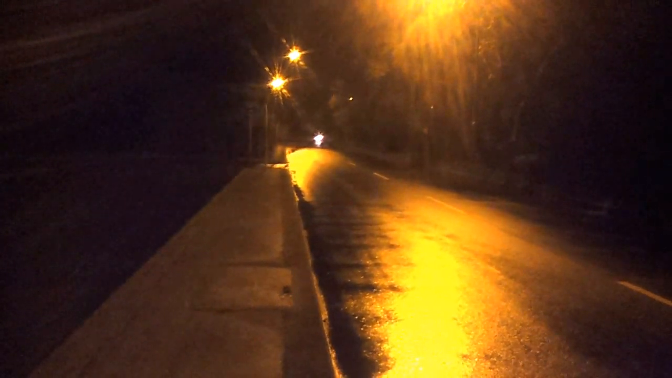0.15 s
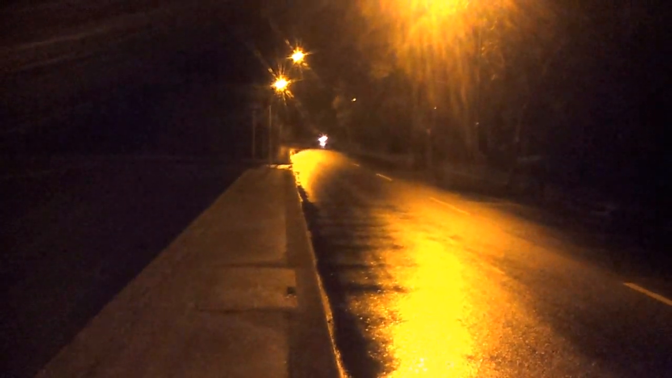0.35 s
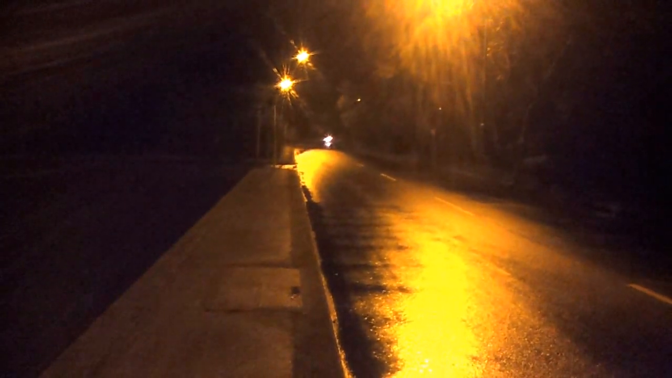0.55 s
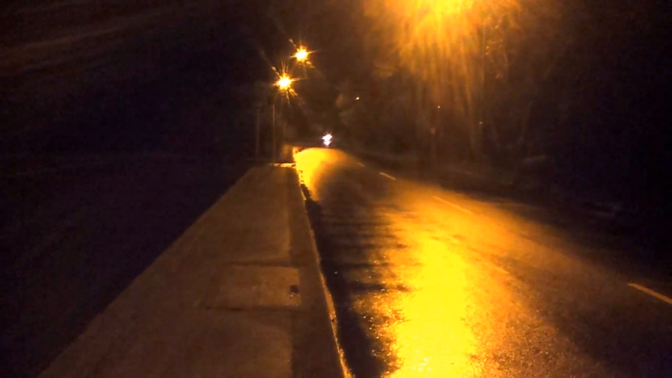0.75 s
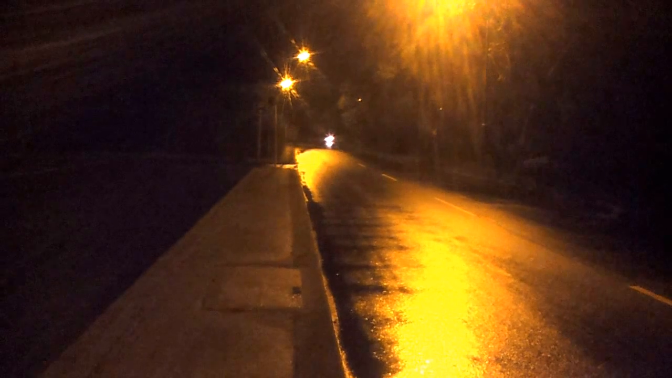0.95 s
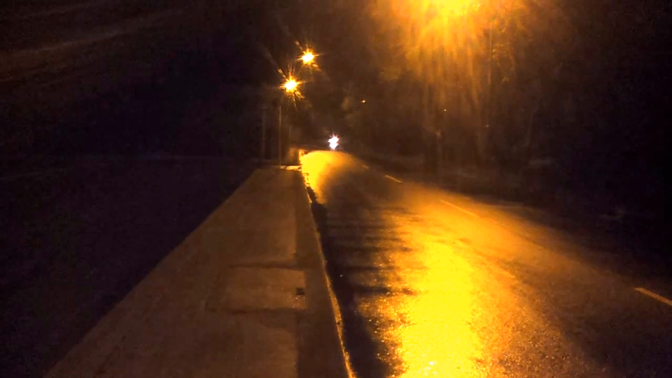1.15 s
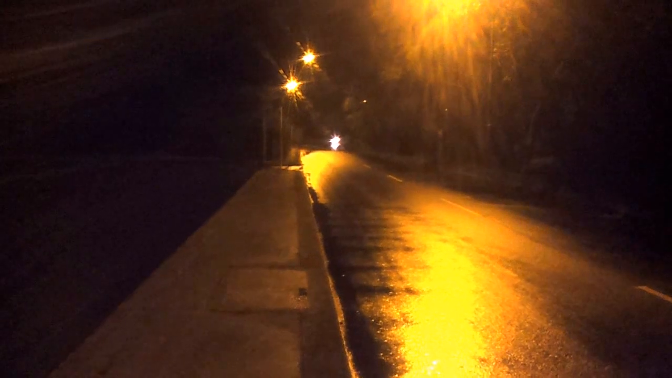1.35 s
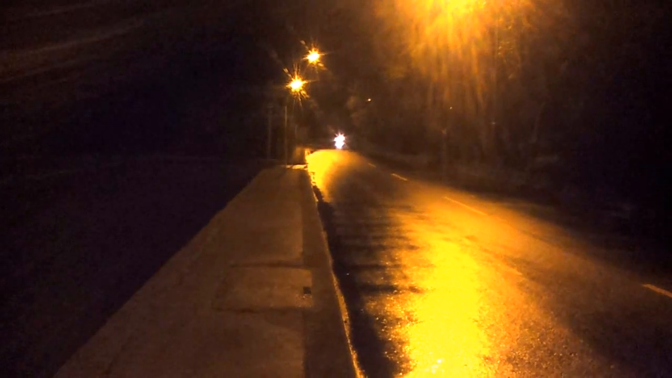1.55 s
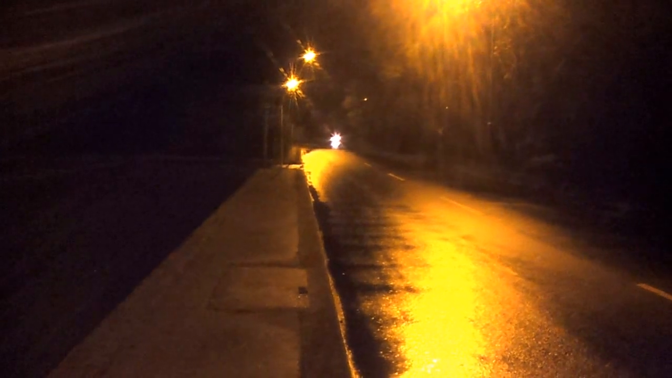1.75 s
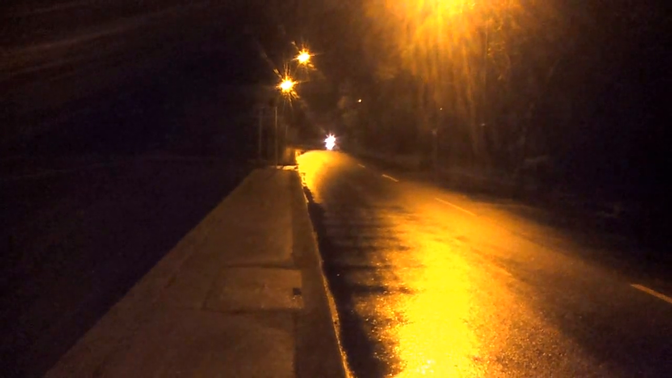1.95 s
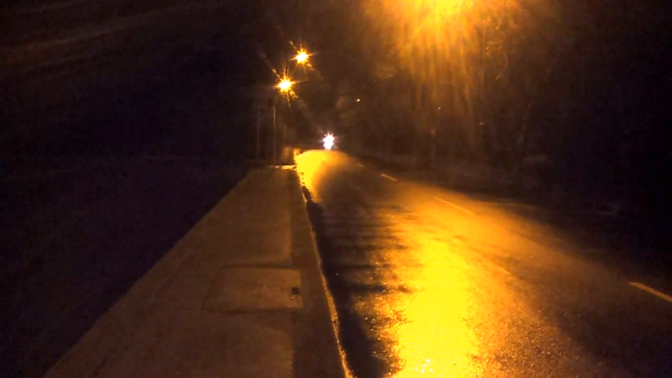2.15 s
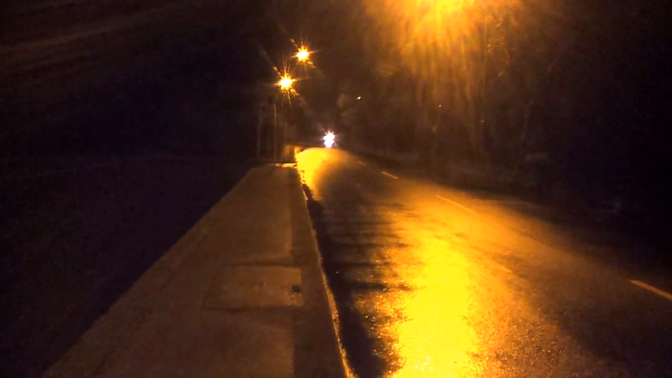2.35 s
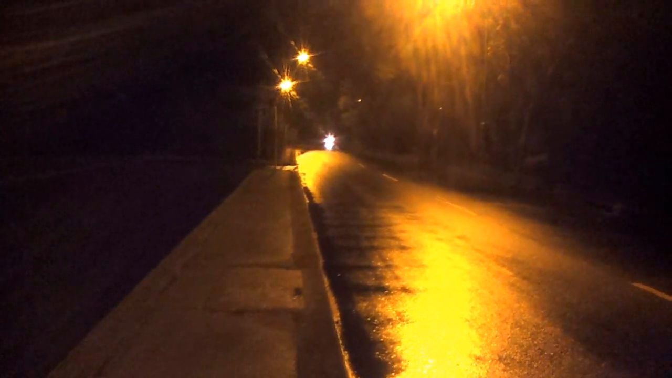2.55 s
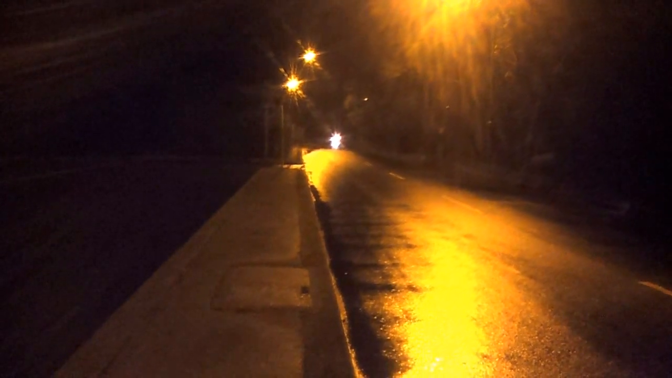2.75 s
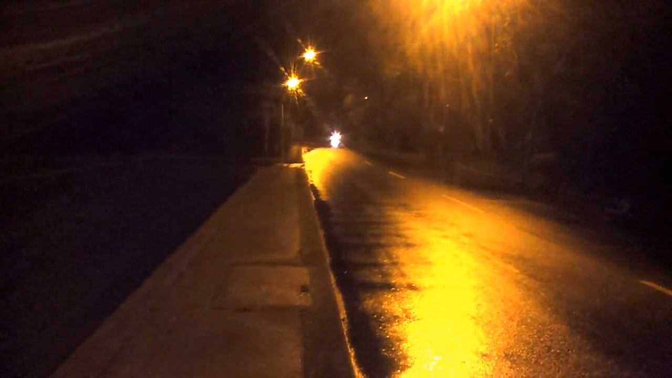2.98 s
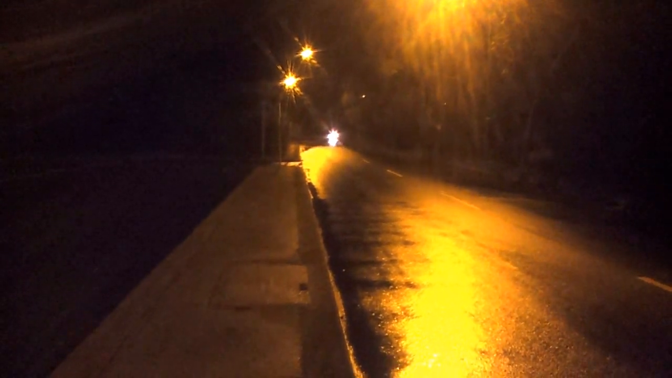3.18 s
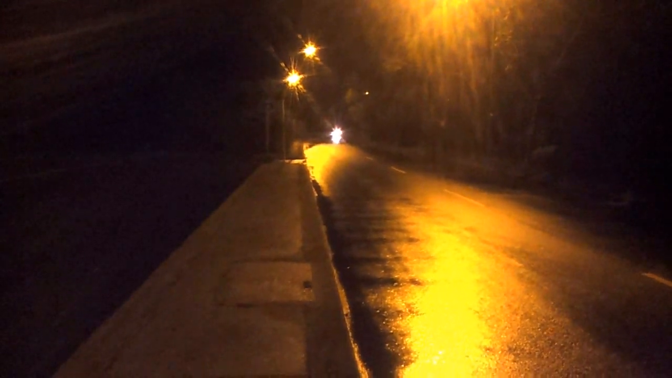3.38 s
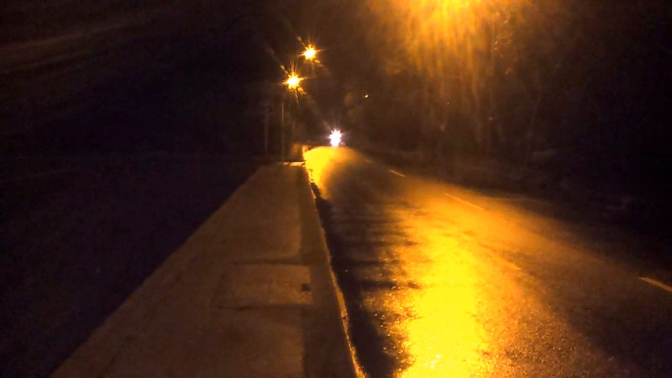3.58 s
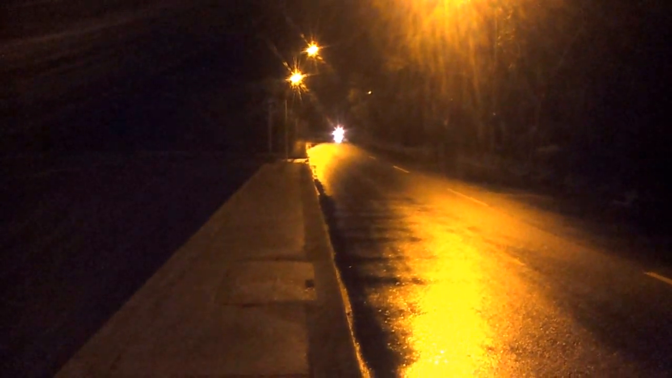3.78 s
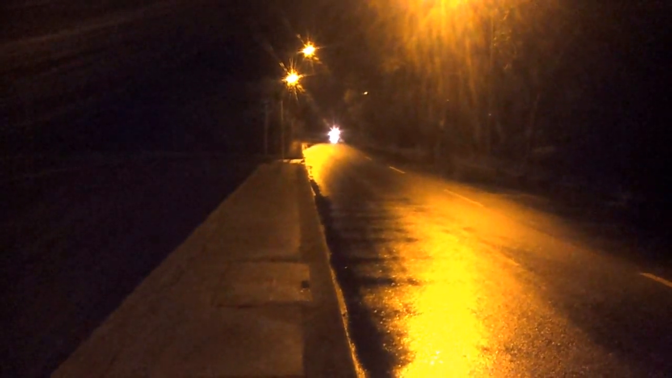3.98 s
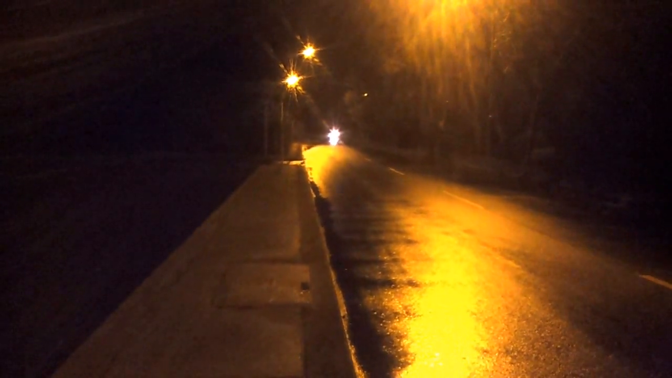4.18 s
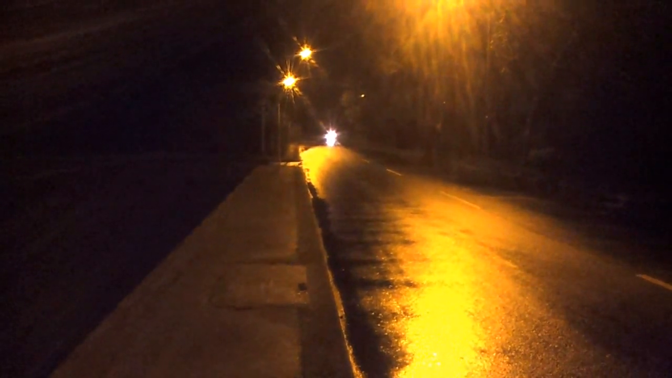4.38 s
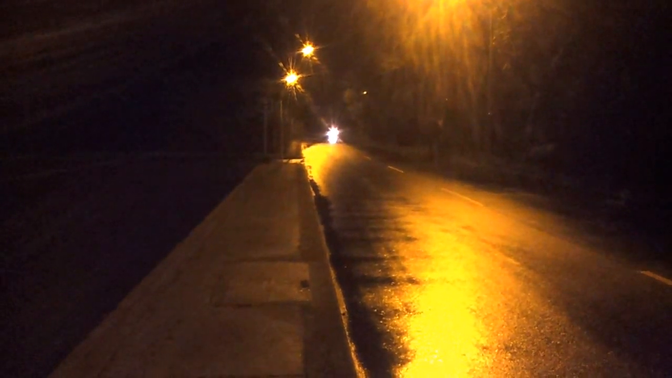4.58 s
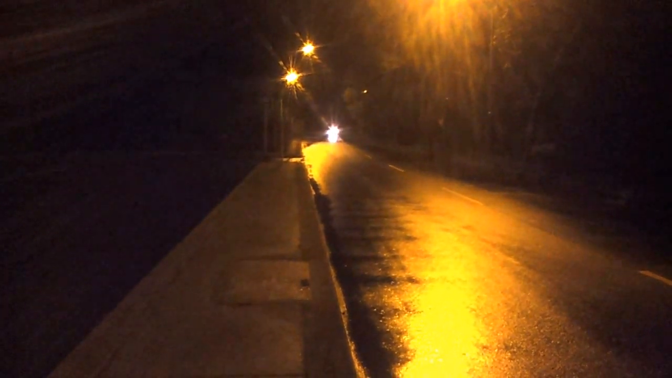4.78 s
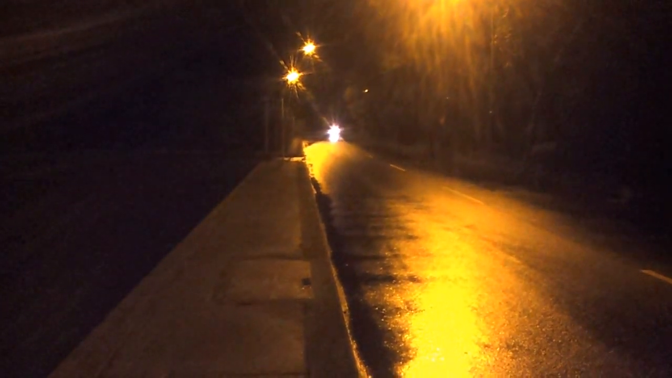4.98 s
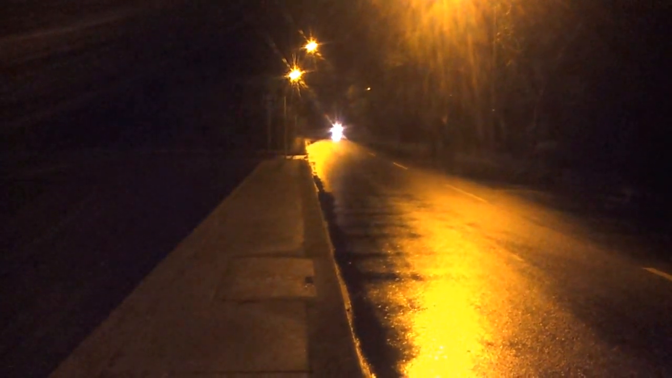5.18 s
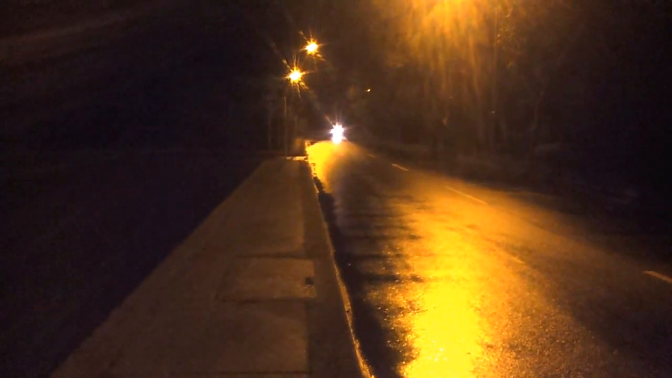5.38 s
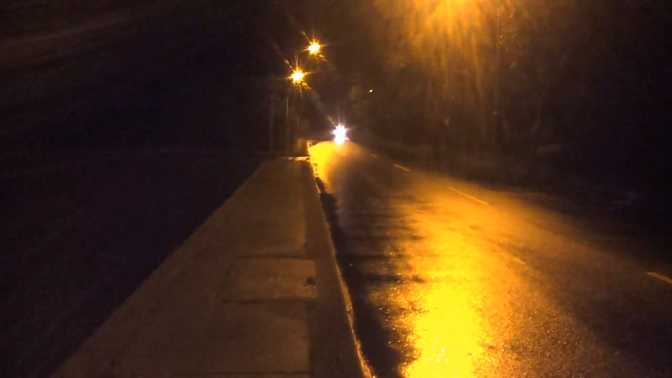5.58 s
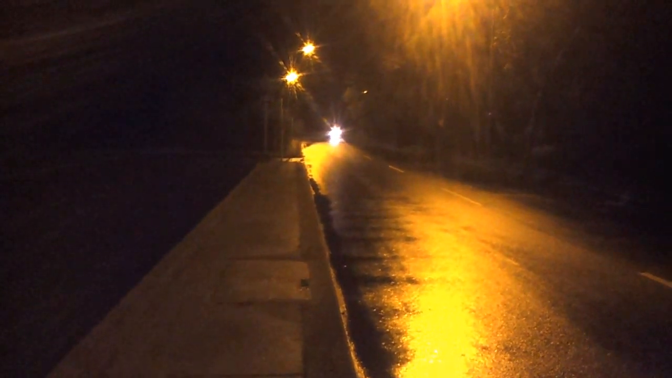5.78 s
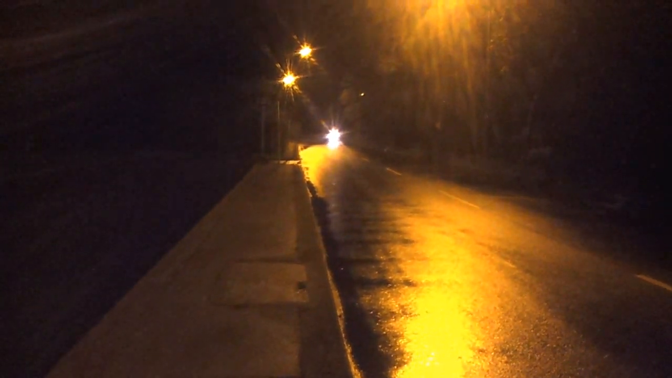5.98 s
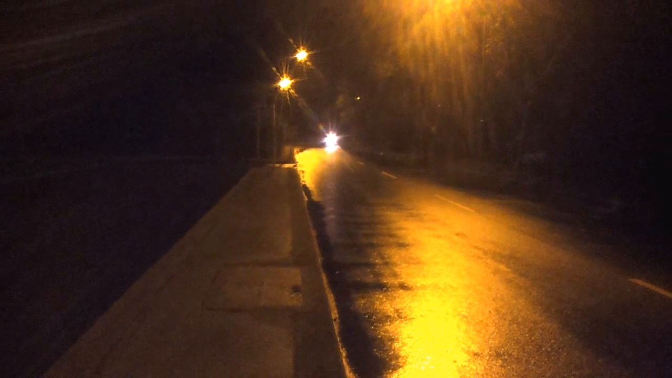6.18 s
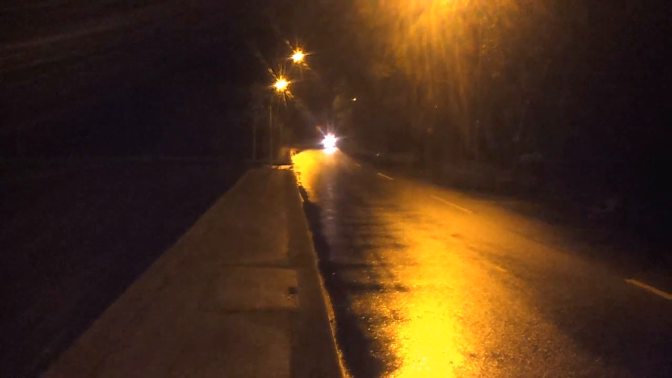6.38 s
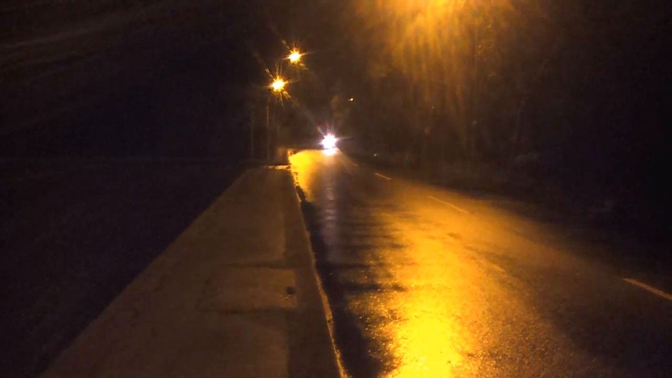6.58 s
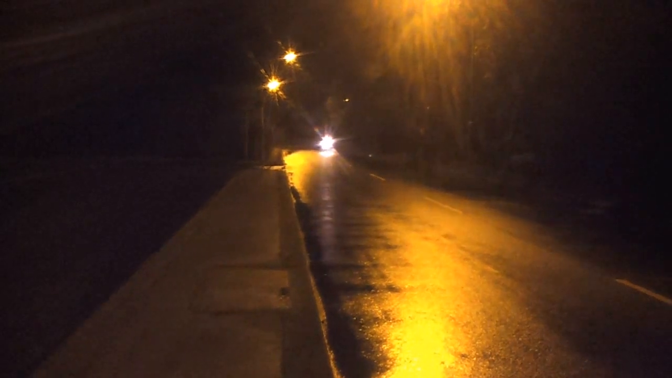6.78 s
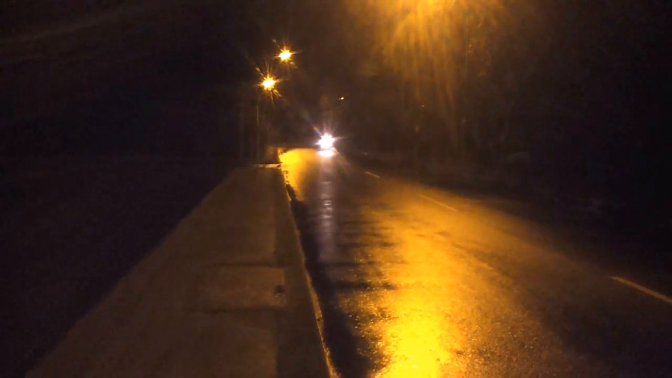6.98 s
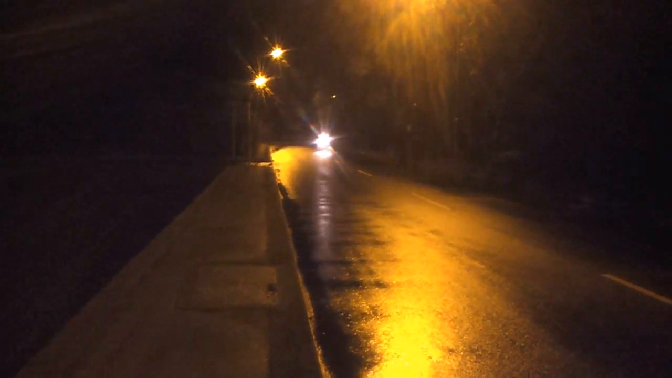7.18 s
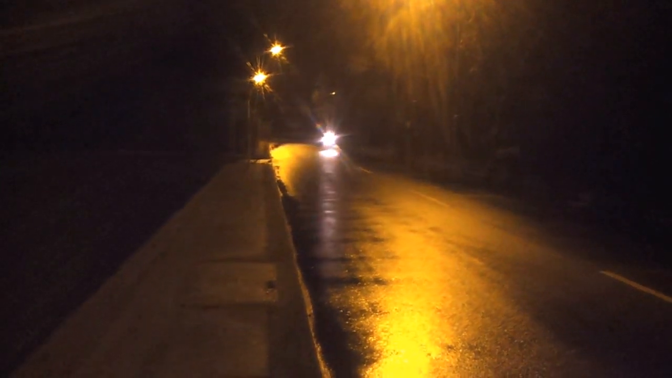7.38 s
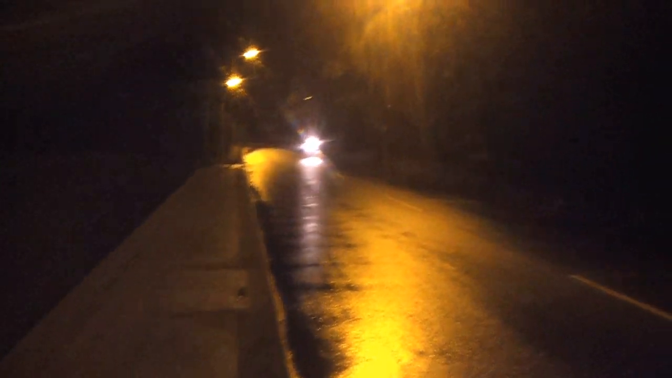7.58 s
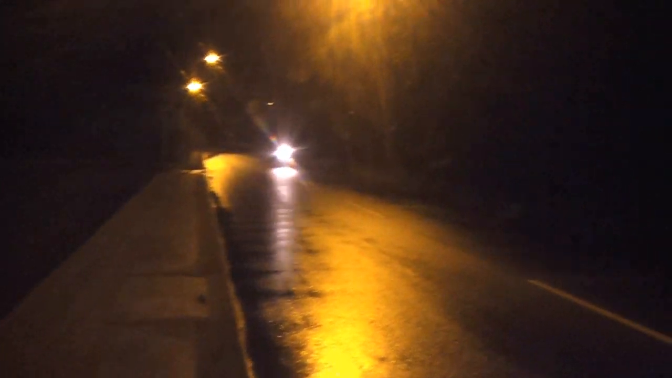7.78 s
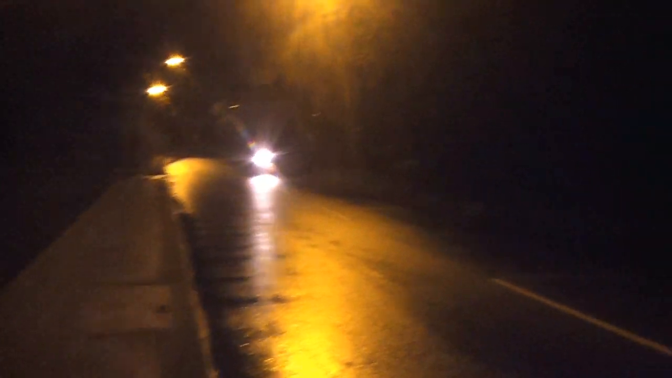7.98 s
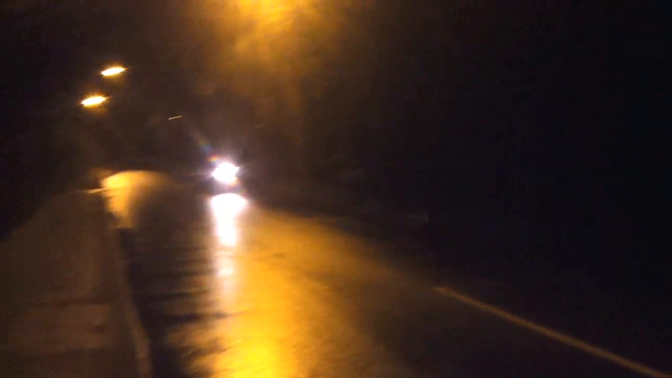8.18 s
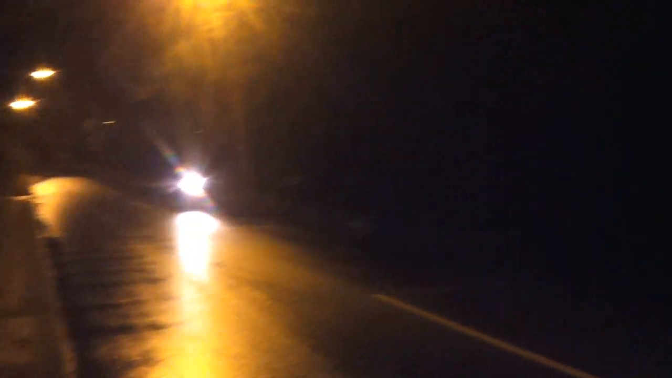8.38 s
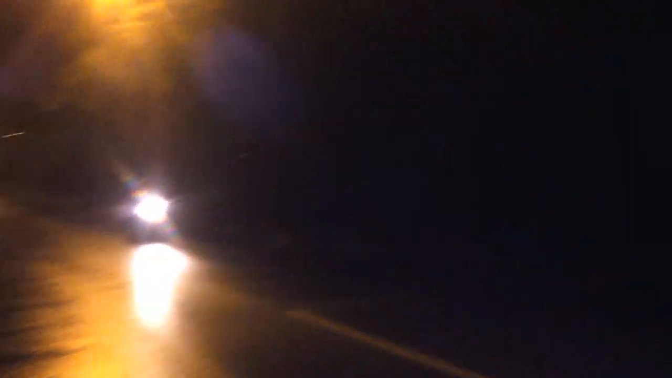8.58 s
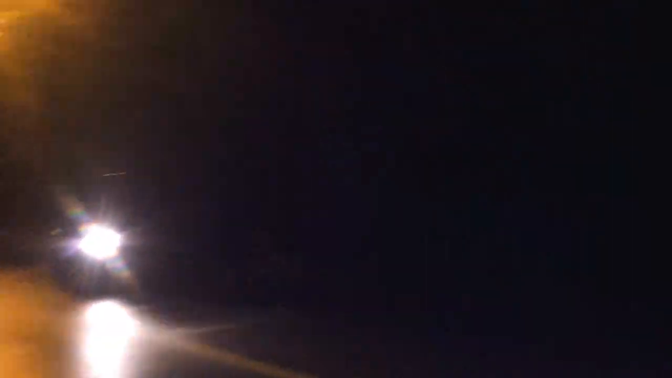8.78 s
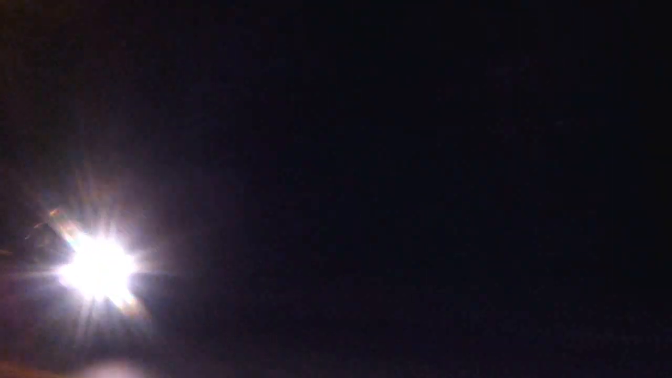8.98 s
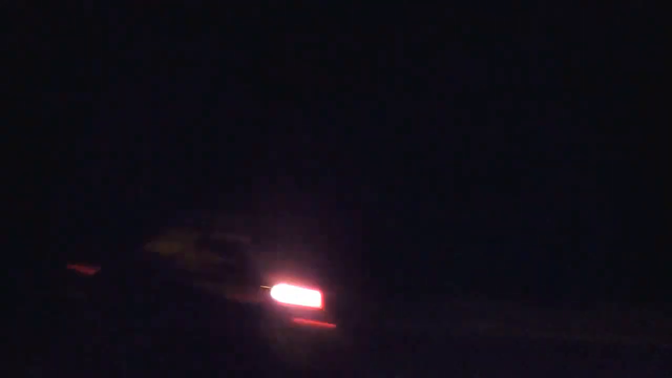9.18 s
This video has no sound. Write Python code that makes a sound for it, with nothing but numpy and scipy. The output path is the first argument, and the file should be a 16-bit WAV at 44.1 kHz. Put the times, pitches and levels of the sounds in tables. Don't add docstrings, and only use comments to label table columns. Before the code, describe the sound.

Over faint night hiss, a four-cylinder motorcycle winds up from far off, barks through a gear change and roars close, loud and distorted.

```python
import sys
import numpy as np
from scipy import signal
from scipy.fft import rfft, irfft, next_fast_len
from scipy.io import wavfile
from scipy.ndimage import uniform_filter1d, map_coordinates

SR = 44100
rng = np.random.default_rng(int(sys.argv[2]) if len(sys.argv) > 2 else 0)


def put_to_file(sound):
    columns = np.atleast_2d(sound).T
    safe = np.clip(columns, -1, 1)
    whole_steps = np.round(safe * 32767)
    wavfile.write(sys.argv[1], SR, whole_steps.astype(np.int16))


def makeup_ratio(level_db):
    decades = np.asarray(level_db, float) / 20
    return 10 ** decades


N = 407484
TIME_S = np.arange(N) / SR
HOP = 64

# frequency_hz, density_db (per Hz)
NIGHT_SPECTRUM = [(30, 3), (90, -2), (300, -2.5), (550, -2.5), (800, -28.5), (1200, -1.5), (1500, -48),
                  (1950, 1.5), (2400, -25), (3700, -29), (5000, -13.5), (7500, -18.5), (11000, -22),
                  (15000, -20)]
# frequency_hz, level_db
CAMERA_WHINE = [(1960, -57), (4606, -68), (5348, -73)]
# frequency_hz, density_db (per Hz)
BREEZE_SPECTRUM = [(20, 11), (45, -9), (90, -13), (200, -51)]

# time_s, firing_hz
ENGINE_SPEED = [(0, 60.3), (1.1, 58.56), (1.15, 67), (1.3, 130.2), (1.63, 245.8), (1.8, 266), (2.45, 281),
                (2.88, 315), (3.35, 308.6), (3.98, 334.9), (4.9, 341.3), (5.73, 403.6), (6.34, 478),
                (6.74, 523.6), (7.38, 582.8), (7.7, 422.1), (8.47, 442.7), (9.24, 399.9)]
# time_s, sag_hz, fall_s, recovery_s
SPEED_SAGS = [(0.82, 4, 0.41, .22), (2.02, 14, .22, 0.36), (2.2, 42, 0.13, .2), (2.64, 22, .2, .23),
              (3.11, 30.5, 0.19, 0.23), (3.58, 27, 0.22, .3), (4.331, 17, 0.32, 0.41), (5.15, 37, .22, .55),
              (7.63, -30, 0.062, 0.064), (7.76, -9, 0.0468, 0.046), (8.56, 30, 0.087, .11)]
# time_s, loudness_db, load_db
EFFORT_CURVE = [(0, -59.5, 1), (0.2, -56, 1.5), (1.15, -55, -2.5), (1.3, -45.5, 3), (1.45, -44.5, 2),
                (1.6, -38.5, 2.5), (2.05, -40, 1.1), (2.4, -38, 0.9), (2.85, -36.5, -2.5),
                (4.1, -34.5, 0.2), (5.2, -32, 1), (5.7, -28, 3), (6.4, -24, -0.5), (7.36, -18.5, 1),
                (7.7, -19.5, -1.6), (8.47, -13.5, -2.5), (8.6, -13.5, -6.5), (9.24, -8, 0.5)]
# centre_s, length_s, depth_db
THROTTLE_CUTS = [
    (2.147, .045, 16),
    (7.496, 0.13, 6.5),
    (8.665, 0.14, 7.5),
]
# centre_s, length_s, level_db
MISSED_FIRINGS = [
    (2.097, 0.0097, -30),
    (2.196, 0.0066, -42),
    (7.394, 0.0044, -11.5),
    (7.564, 0.0099, -6.5),
    (7.574, .011, -26),
    (7.608, 0.014, -9.5),
    (8.51, 0.021, -26),
]
# firing_hz, firing_tone_db, octave_db, cylinder_imbalance_db
PIPE_BOOM = [(58, -4, -4.5, -13), (125, 3, 1, -9.5), (248, -7, -6, -5), (287, 3, 3.5, -4),
             (324.9, 1, 2.5, -3), (426.2, -0.2, -10.5, -1.5), (503, 5.5, -2.5, 1.8), (550.3, 0.2, -6.5, -4)]
# frequency_hz, low_in_gear_db, wound_out_db, alongside_db
PIPE_RESPONSE = [(40, 1, -28, -27), (113.25, 5, -17.5, -6.5), (168, -16, -10.5, 0), (227, 6.5, -17, -20),
                 (445.3, -4.5, -10.5, -25), (573, 2, 0.5, -4), (859.9, 1.5, -19.5, -11),
                 (1016, 7.5, -7, -11), (1420, -2, -8, -7.5), (1710, -4.5, -4, 4.5),
                 (2020, -6.5, -8.5, -7.5), (2217.4, -29, -12.5, 2), (2799, -22, -19.5, -38),
                 (4400, -11, -30, -33)]
# time_s, place (0 low in gear, 1 wound out, 2 alongside)
APPROACH_PLACE = [
    (0, 0),
    (2.5, 0.64),
    (3.2, 0.66),
    (7.4, 1.18),
    (7.7, 0.81),
    (8.5, 0.51),
    (8.85, 1.88),
    (9.24, 2.26),
]
# frequency_hz, density_db (per Hz)
GAS_SPECTRUM = [(30, -57), (120, -23), (300, -10), (520, -4), (750, -7), (1200, -6.5), (1700, -3),
                (2300, -14), (3000, -53), (4000, -52)]
# frequency_hz, density_db (per Hz)
RASP_SPECTRUM = [(1500, -13.5), (2500, -2.5), (3300, -3), (3800, -2.5), (4250, 1.5), (4700, -1.5),
                 (5500, -8.5), (7000, -5.5), (9000, -18)]
# frequency_hz, density_db (per Hz)
SIZZLE_SPECTRUM = [(4500, -6), (6000, -0.5), (6800, -3), (7700, 1), (8500, 1), (9600, 1.5), (11500, -3.5),
                   (14000, -9.5), (16000, -15)]

# frequency_hz, gain_db, phase_rad, likeness (0-1)
PORT_AHEAD = [(40, -8, -2.5, 1), (583, -6, -3, 1), (890, -2.5, -3, 0.97), (1290, -2.5, -2.5, 0.98),
              (2125, 2.5, -3, 0.85), (3270, 1, -4.5, 0.46), (4940, -1.5, -5.5, 0.26),
              (5160, -4, -10.5, 0.5), (7860, -5.5, -11.5, 0.46), (8380, -12.5, -26.5, 0.6),
              (8734, -62, -3, 0.2), (9740, -73, -18, 0.16), (10996, -55, -14, 0.1), (15036, -22, -15, 0)]
# frequency_hz, gain_db
PORT_BESIDE = [(40, -11), (800, -4.5), (1500, -2.5), (2100, 1), (4500, 2.5), (6000, -0.5), (8000, -10.5),
               (15000, -8.5)]
# time_s, left_lag_ms, unshaded_share (0-1)
BEARING_CURVE = [
    (0, 0.0037, 0.07),
    (7.3, 0.0068, 0),
    (8, 0.062, 0),
    (8.55, 0.11, 0.1),
    (8.8, 0.18, 0.7),
    (9.05, 0.23, 0.98),
    (9.24, 0.19, 1),
]


def unit(x):
    return x / np.sqrt(np.mean(x ** 2) + 1e-20)


def along(points, hz, axis=1):
    table = np.transpose(points)
    return np.interp(np.log(hz + 1), np.log(table[0] + 1), table[axis])


def curves(rows):
    s, *columns = np.transpose(rows)
    return [np.interp(TIME_S, s, column) for column in columns]


def wobble(rate_hz, size=N):
    knots = rng.standard_normal(int(N * rate_hz / SR) + 4)
    return np.interp(np.arange(size) * N / size * rate_hz / SR, np.arange(len(knots)), knots)


def filtered(x, response):
    m = next_fast_len(N + 8192)
    return irfft(rfft(x, m) * response(np.fft.rfftfreq(m, 1 / SR)), m)[..., :N]


def rush(spectrum, gate=1, patchy_db=0):
    z = signal.stft(gate * rng.standard_normal((2, N)), nperseg=1024)[2]
    field = uniform_filter1d(rng.standard_normal(z.shape[1:]), size=3, axis=0)
    field = uniform_filter1d(field, size=8, axis=1)
    pair = signal.istft(z * makeup_ratio(patchy_db * unit(field)), nperseg=1024)[1][:, :N]
    return unit(filtered(pair, lambda hz: makeup_ratio(along(spectrum, hz))))


def amplifier_hiss():
    return makeup_ratio(-53.0) * rush([(30, -2), (3000, -1.5), (9000, -10), (16000, -10)])


def breeze():
    return makeup_ratio(0.61 * curves(EFFORT_CURVE)[0] - 50) * rush(BREEZE_SPECTRUM)


def night():
    whine = 0
    for hz, level_db in CAMERA_WHINE:
        phase = 2 * np.pi * hz * TIME_S + .7 * wobble(40)
        whine = whine + makeup_ratio(level_db + .6 * wobble(9)) * np.sin(phase)
    return makeup_ratio(-44 + .8 * wobble(3)) * rush(NIGHT_SPECTRUM, patchy_db=.6) + whine


def ride():
    sag_curve = 1.08
    flywheel_s = 0.026
    sag_hz = sum(hz * np.interp(TIME_S, [s - fall, s, s + rise], [0, 1, 0]) ** sag_curve
                 for s, hz, fall, rise in SPEED_SAGS)
    firing_hz = uniform_filter1d(curves(ENGINE_SPEED)[0] - sag_hz, int(flywheel_s * SR))
    loud_db, load_db = curves(EFFORT_CURVE)
    cut_db = sum(depth_db * np.exp(-((TIME_S - s) / length_s) ** 4 / 2) for s, length_s, depth_db in THROTTLE_CUTS)
    tone_db = 0.78 * loud_db + along(PIPE_BOOM, firing_hz) + 0.21 * cut_db
    octave_db = 0.78 * loud_db + along(PIPE_BOOM, firing_hz, axis=2) - 0.092 * cut_db
    over_db = 0.77 * loud_db - 1.55 + load_db - cut_db
    uneven_db = along(PIPE_BOOM, firing_hz, axis=3) + 0.85 * cut_db
    rasp_db = loud_db - 0.023 * cut_db
    return firing_hz, tone_db, octave_db, over_db, uneven_db, rasp_db


def orders(multiples, firing_hz, turns, drift_db, blur):
    slow_hz = firing_hz[::HOP]
    place = curves(APPROACH_PLACE)[0]
    shares = [np.clip(1 - np.abs(place[::HOP] - column), 0, 1) for column in range(3)]
    soft_db = -8 * np.exp(-(slow_hz / 185) ** 2)

    def pipe_db(hz):
        return sum(share * along(PIPE_RESPONSE, hz, axis=1 + i) for i, share in enumerate(shares))

    gains = np.array([makeup_ratio(pipe_db(k * slow_hz) + soft_db * np.log2(max(k, 1))) for k in multiples])
    gains /= np.sqrt(np.sum(gains ** 2, 0) / 2)
    far = np.clip(1.9 - .8 * place, .35, 1)
    total = np.zeros(N)
    for k, gain in zip(multiples, gains):
        flicker = .4 * wobble(4, size=len(gain)) + 1.1 * wobble(16 + 4 * k, size=len(gain))
        level = np.interp(np.arange(N) / HOP, np.arange(len(gain)), gain * makeup_ratio(drift_db * flicker))
        fray = blur * (1 + .1 * k) * far * wobble(25 + 25 * k)
        total += level * np.sin(2 * np.pi * (k * turns + rng.random()) + fray)
    return total


def firing_tone(firing_hz, turns, tone_db, octave_db):
    tone = makeup_ratio(tone_db) * orders([1], firing_hz, turns, drift_db=1.1, blur=.15)
    return tone + makeup_ratio(octave_db) * orders([2], firing_hz, turns, drift_db=1.3, blur=.17)


def overtones(firing_hz, turns, tone_db, over_db, uneven_db):
    over = makeup_ratio(over_db) * orders(range(3, 15), firing_hz, turns, drift_db=2.4, blur=.4)
    crank = makeup_ratio(over_db + uneven_db - 1) * orders(np.arange(13) + .5, firing_hz, turns, drift_db=2.8, blur=.42)
    cycle_level = makeup_ratio(.5 * (over_db + tone_db) - 8)
    cycle = cycle_level * orders(np.arange(1, 40, 2) / 4, firing_hz, turns, drift_db=3, blur=.45)
    return over + crank + cycle


def misfire_bark(missing, turns):
    slow = np.cos(np.pi * turns) + .3 * np.cos(np.pi * turns / 2)
    slow += .15 * np.cos(1.5 * np.pi * turns) + .3 * np.cos(3 * np.pi * turns)
    return missing * slow


def gear_whine(turns, rasp_db):
    gear_teeth, chain_order = 20, 5.5
    gears = makeup_ratio(1.07 * rasp_db - 11 + 2.0 * wobble(2.6)) * np.sin(2 * np.pi * gear_teeth * turns + .5 * wobble(40))
    chain_level = makeup_ratio(2.36 * rasp_db + 4.5 + 1.5 * wobble(9.7))
    return gears + chain_level * np.sin(2 * np.pi * chain_order * turns + 0.48 * wobble(30))


def gas_noise(turns, over_db, rasp_db):
    puff = 1 + 0.16 * np.cos(2 * np.pi * turns) + 0.023 * np.cos(np.pi * turns)
    power = np.maximum(makeup_ratio(rasp_db) ** 2 - makeup_ratio(-57) ** 2, 1e-7)
    noise_db = 10 * np.log10(power) + .35 * wobble(11)
    gas = makeup_ratio(.6 * noise_db + .4 * over_db - 4.5) * rush(GAS_SPECTRUM, puff, patchy_db=2)
    rasp = makeup_ratio(noise_db - 1.6) * rush(RASP_SPECTRUM, puff, patchy_db=2.5)
    treble_db = np.minimum(0.61 * (noise_db + 22.5), 3.5)
    sizzle = makeup_ratio(noise_db + treble_db + 2.17) * rush(SIZZLE_SPECTRUM, puff, patchy_db=2.0)
    return gas + rasp + sizzle


def motorcycle():
    firing_hz, tone_db, octave_db, over_db, uneven_db, rasp_db = ride()
    turns = np.cumsum(firing_hz) / SR
    turns += .012 * wobble(70) + .012 * wobble(20)
    missing = sum(makeup_ratio(level_db) * np.exp(-.5 * ((TIME_S - s) / length_s) ** 2)
                  for s, length_s, level_db in MISSED_FIRINGS)
    tone = firing_tone(firing_hz, turns, tone_db, octave_db)
    tone *= np.clip(1 - 1.5 * missing / makeup_ratio(tone_db), .4, 1)
    tones = tone + overtones(firing_hz, turns, tone_db, over_db, uneven_db)
    tones += misfire_bark(missing, turns) + gear_whine(turns, rasp_db)
    scattered = np.pad(tones, (1500, 0))[:N]
    return np.array([tones, scattered]) + gas_noise(turns, over_db, rasp_db)


def ports(sound):
    lag_ms, open_share = curves(BEARING_CURVE)

    def mix(hz):
        alike = np.clip(along(PORT_AHEAD, hz, axis=3), 0, 1)
        turned = alike * np.exp(1j * along(PORT_AHEAD, hz, axis=2))
        return np.array([turned, np.sqrt(1 - alike ** 2)])

    right = filtered(sound, mix).sum(0)
    shaded = filtered(right, lambda hz: makeup_ratio(along(PORT_AHEAD, hz)))
    clear = filtered(right, lambda hz: makeup_ratio(along(PORT_BESIDE, hz)))
    share = np.clip(open_share, 0, 1)
    left = map_coordinates(sound[0], [np.arange(N) - lag_ms * SR / 1000], mode="nearest")
    return np.array([left, (1 - share) * shaded + share * clear])


def scene():
    return ports(night() + motorcycle()) + amplifier_hiss() + breeze()


def roll_off(x):
    return signal.sosfilt(signal.butter(12, 15820, fs=SR, output="sos"), x)


def record(dry):
    def microphone(hz):
        low = (hz / 25) ** 2
        return low / (1 + low) / (1 + (hz / 15500) ** 30)

    heard = filtered(dry, microphone)
    held = heard / (1 + np.abs(heard / 1.04) ** 6) ** (1 / 6)
    return roll_off(held)


dry = scene()
out = record(dry)
put_to_file(out)
```